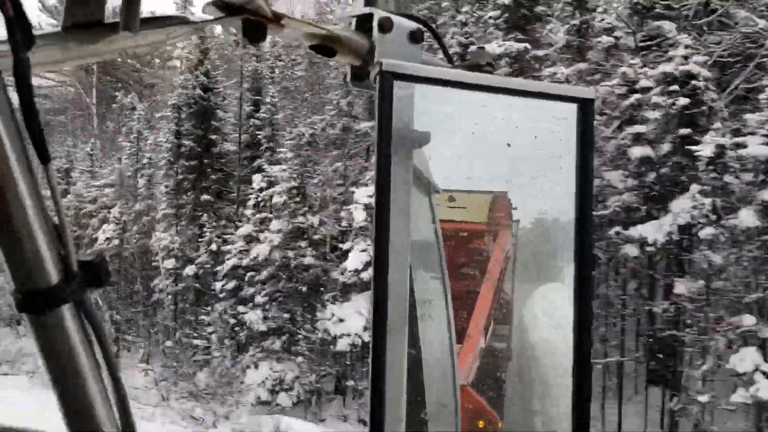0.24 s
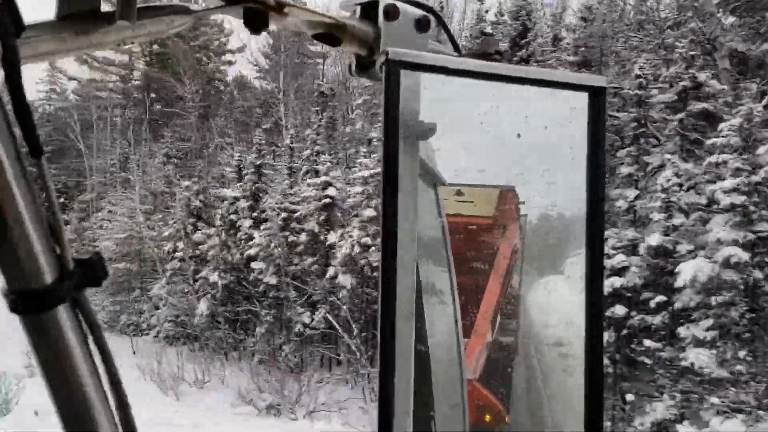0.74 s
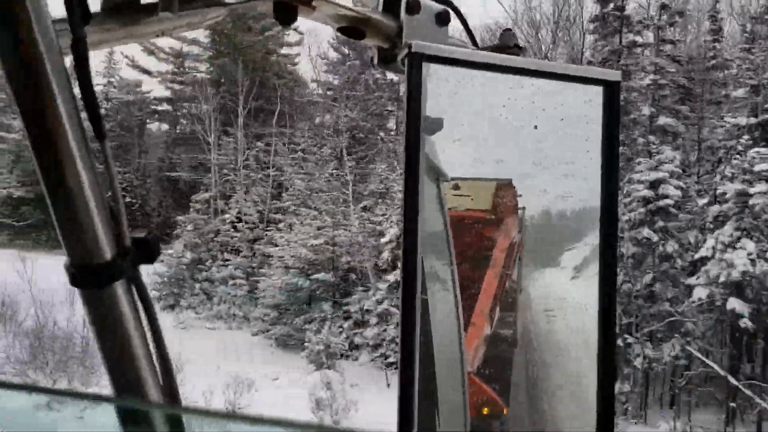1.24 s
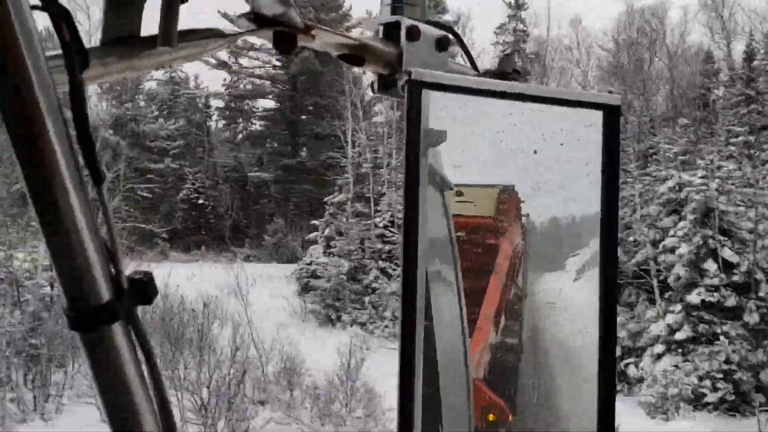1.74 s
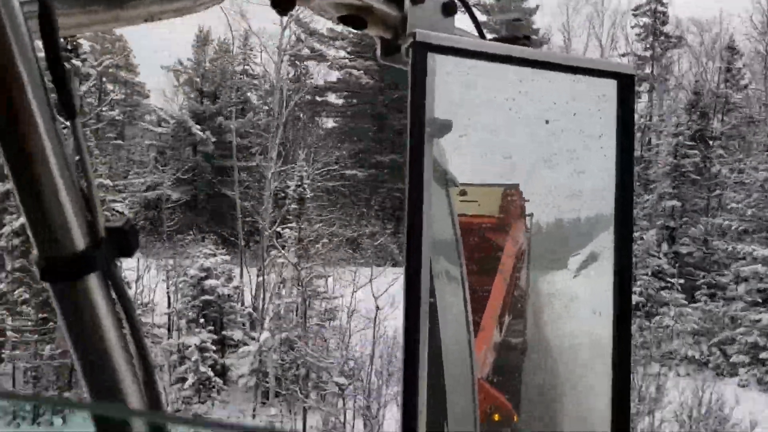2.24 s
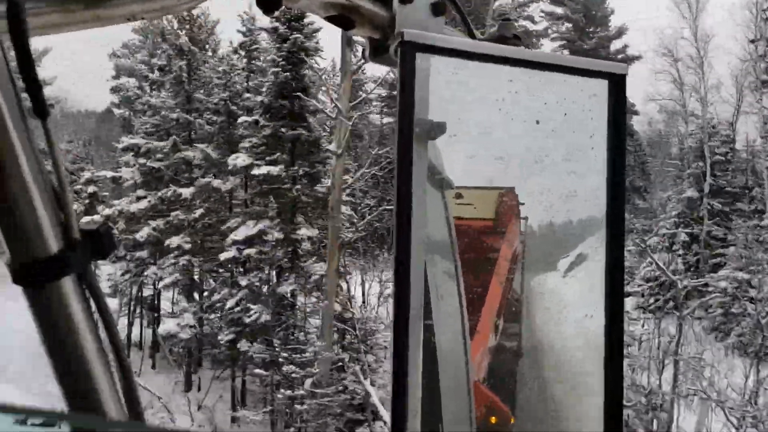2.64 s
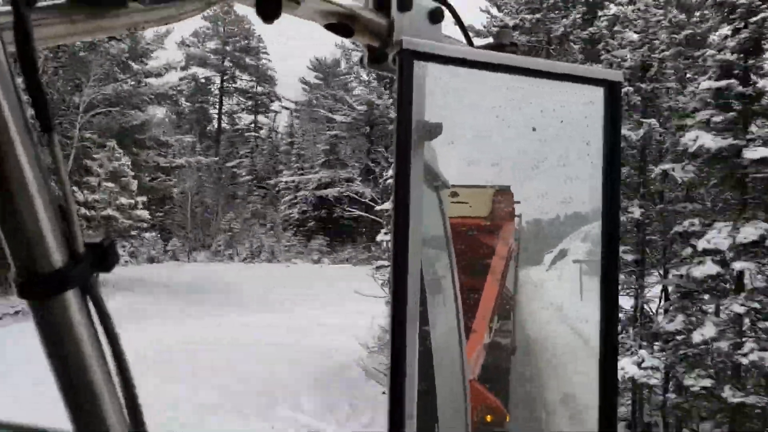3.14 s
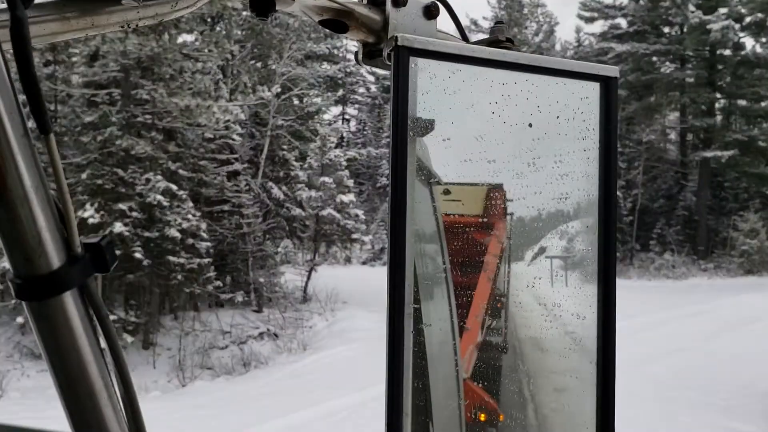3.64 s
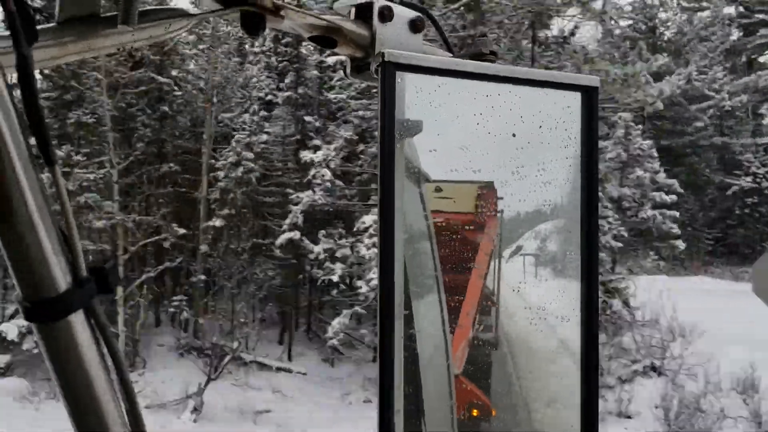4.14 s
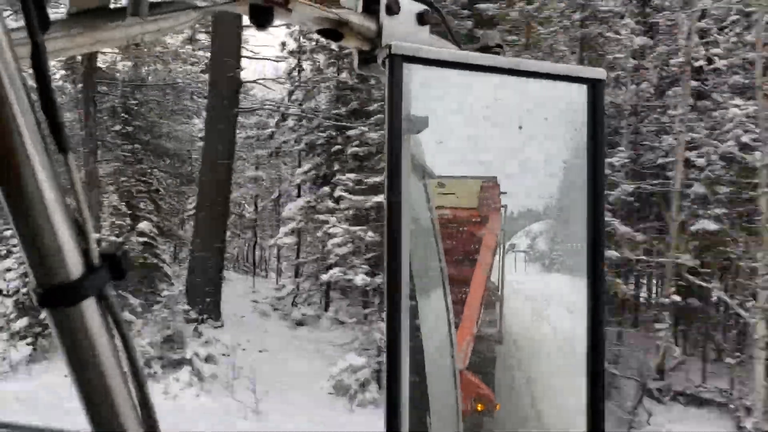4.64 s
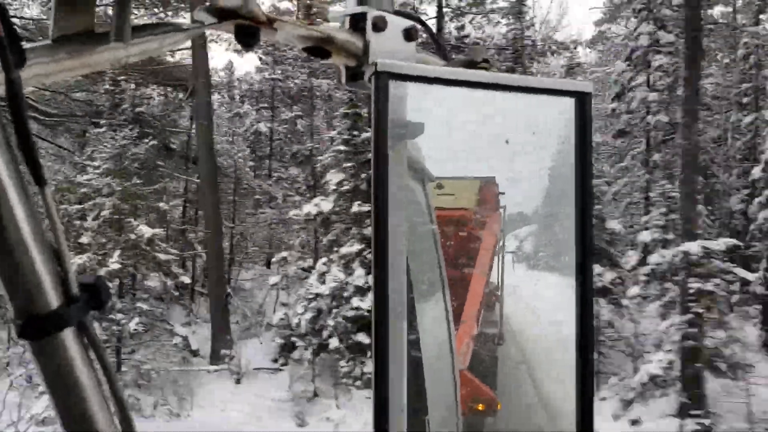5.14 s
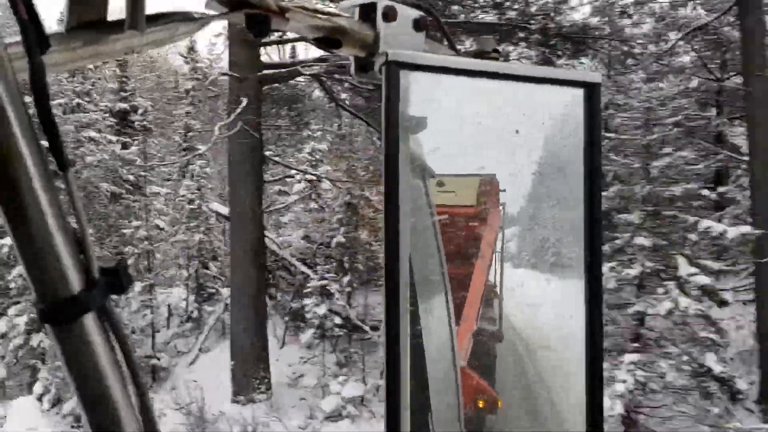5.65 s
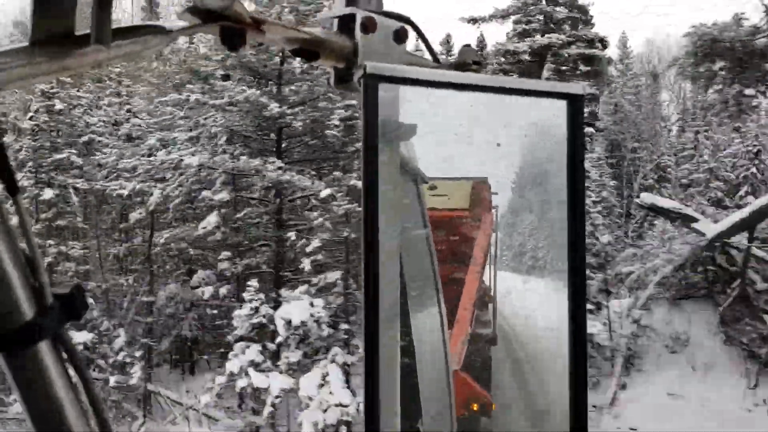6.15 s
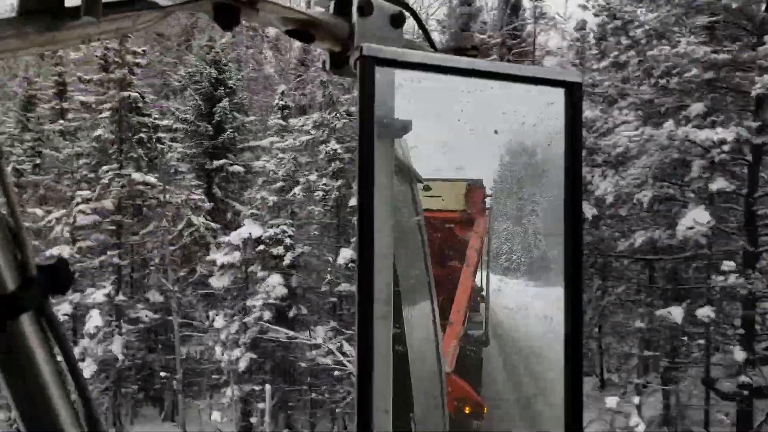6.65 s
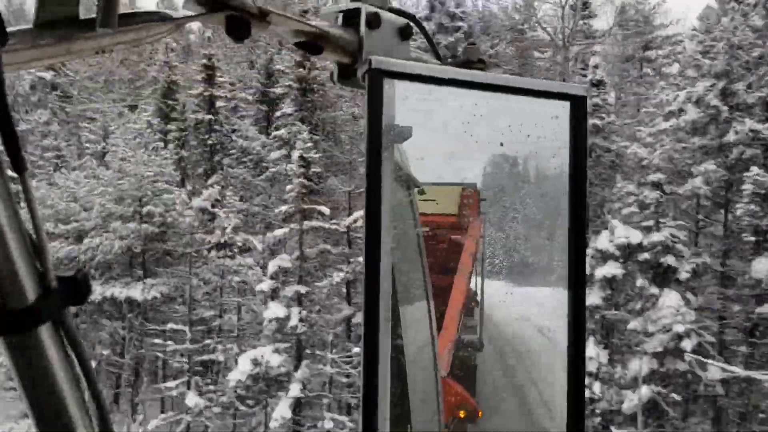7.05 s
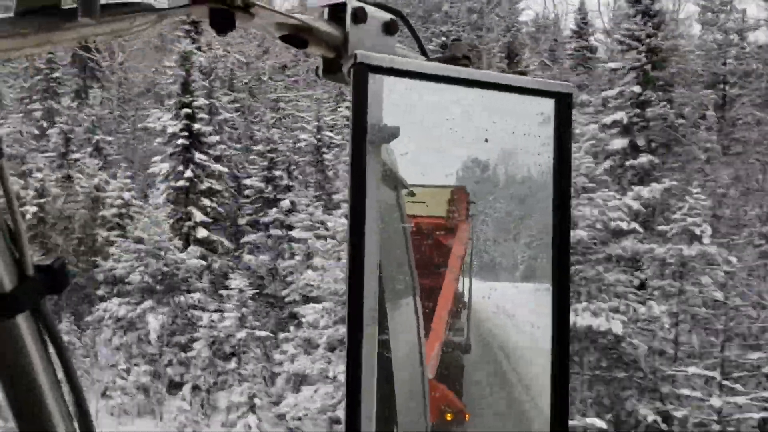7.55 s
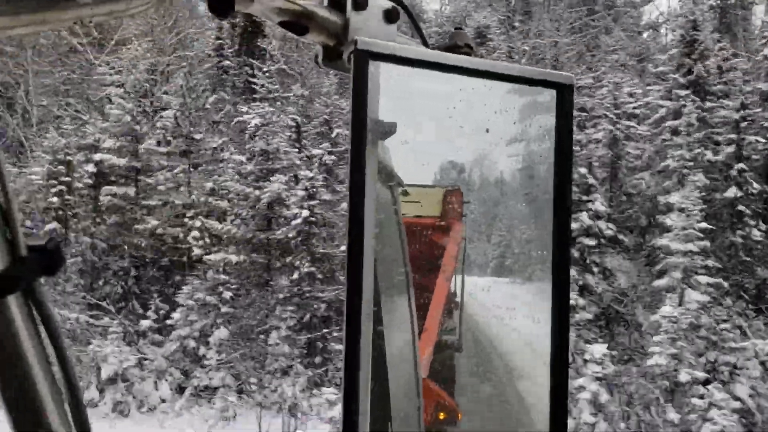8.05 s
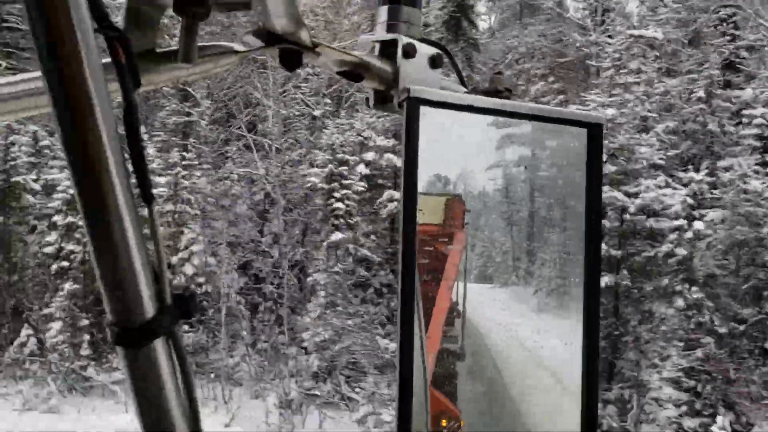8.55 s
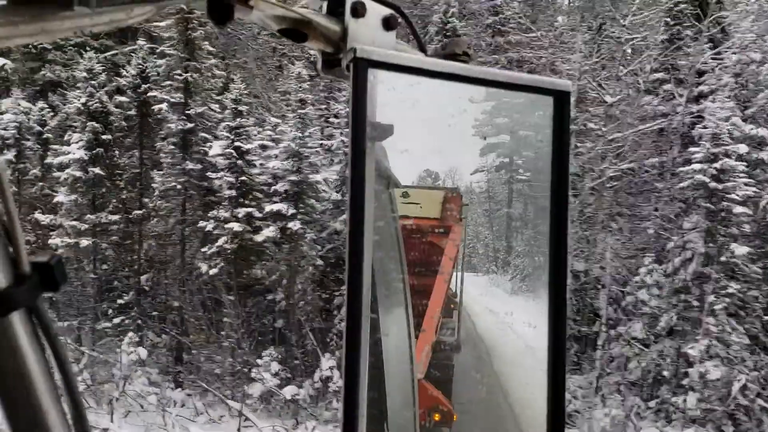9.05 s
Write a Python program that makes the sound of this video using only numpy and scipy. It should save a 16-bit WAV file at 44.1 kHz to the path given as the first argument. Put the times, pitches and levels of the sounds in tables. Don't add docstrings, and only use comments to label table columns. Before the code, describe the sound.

From an open cab window, a truck's engine brake cuts out, the turbo whistle winds down, clunks follow, then rough low braking drone returns.

```python
import sys
import numpy as np
from scipy import signal
from scipy.fft import rfft, irfft, next_fast_len
from scipy.io import wavfile
from scipy.ndimage import uniform_filter1d

SR = 44100
rng = np.random.default_rng(int(sys.argv[2]) if len(sys.argv) > 2 else 0)


def field_ratio(decibels):
    return 10 ** (np.asarray(decibels, dtype=float) / 20)


def transcribe(signal):
    frames = np.atleast_2d(signal).T
    limited = np.clip(frames, -1, 1)
    pcm = np.round(limited * 32767).astype(np.int16)
    wavfile.write(sys.argv[1], SR, pcm)


N = 410130
TIME = np.arange(N) / SR
SIZE = next_fast_len(N + SR)
FREQ = np.arange(SIZE // 2 + 1) * SR / SIZE

# time in seconds, four-stroke cycles per second.
ENGINE_SPEED = [(0.0, 11.65), (0.35, 11.45), (0.7, 11.285), (2.3, 11.6006), (3.4, 11.849), (3.8, 11.901),
                (4.3, 11.92), (4.8, 11.982), (5.4, 12.073), (6.6, 12.292), (7.8, 12.529), (8.3, 12.507),
                (8.8, 12.507), (9.28, 12.4)]
# place in the cycle 0-1, blow into the pipe in dB, crack at the stack in dB, its lag in ms.
CYLINDERS = [(0.1416, -1.1, -16.7, -6.92), (0.2941, -0.3, -10.8, 0.03), (0.4632, -2.7, -15.2, 0.19),
             (0.6307, 1.2, -6.7, 0.19), (0.7938, 3.8, -0.1, -0.15), (0.9687, 5.7, 0.1, 0.0)]
# share, lag in ms.
FLOOR_THUMPS = [(0.118, -4.13), (-0.104, -5.41), (-0.035, -4.8), (-0.089, -2.65), (0.06, -5.9),
                (-0.106, -1.85)]
# frequency in Hz, width in Hz, level in dB, polarity.
PIPE_MODES = [(68.5, 7.0, -20.2, -1.0), (102.8, 7.0, 0.0, 1.0), (119.0, 42.1, -7.3, -1.0),
              (137.8, 15.4, -3.1, 1.0), (163.3, 7.0, -0.6, 1.0), (202.9, 7.0, -14.4, -1.0),
              (226.4, 8.6, -20.7, -1.0), (268.1, 10.8, -18.2, -1.0), (283.2, 18.9, -26.8, -1.0),
              (308.2, 13.0, -13.7, -1.0)]
# frequency in Hz, width in Hz, level in dB, polarity.
STACK_MODES = [(356, 20, -1.0, -1), (440, 193, -0.6, 1), (535, 23, 0.1, -1), (629, 114, -1.4, -1),
               (812, 40, -6, 1), (1056, 500, -17, -1)]
# time in seconds, blow level in dB.
BRAKE_EFFORT = [
    [(0.0, -14.5), (0.03, -11), (0.045, -19.5), (0.065, -11), (0.195, -10.5), (0.215, -19), (0.27, -11.5),
     (0.32, -16.5), (0.42, -19)],
    [(3.695, -12.5), (3.8, -9.5), (4.63, -9.5), (6.36, -11.5), (7.1, -11.5), (7.33, -15), (8.13, -15.5),
     (8.77, -11), (9.3, -10)],
]
# time in seconds, level in dB.
COAST_HUM = [(0.3, -51), (0.44, -24.5), (2.32, -24), (2.37, -34), (2.84, -40), (3.24, -40.5), (3.6, -42),
             (3.64, -25), (3.7, -20)]
# time in seconds, level in dB.
ROAR_LEVEL = [(0.0, -37.5), (0.35, -39), (1.09, -39), (1.9, -37), (2.17, -34), (2.35, -33.5), (2.38, -37.5),
              (2.72, -44), (2.77, -45.5), (3.46, -46.5), (3.6, -41), (3.73, -37.5), (4.1, -42),
              (6.8, -39.5), (7.48, -43.5), (8.18, -44), (8.9, -39.5), (9.3, -40)]
# frequency in Hz, level in dB per Hz.
RUMBLE_SPECTRUM = [(12, -41), (20, -9.5), (145, 4), (222, -6), (313, -1.5), (463, -14.5), (511, -17.5),
                   (583, -11.5), (782, -19.5), (1000, -20.5), (1300, -61), (2200, -120)]
ROAD_SPECTRUM = [(290, -30), (500, -1), (714, -15.5), (817, -2), (1180, -18.5), (1320, -0.5), (1700, -11),
                 (1850, -21.5), (2040, -8), (5000, -30), (6500, -71), (11000, -120)]
HISS_SPECTRUM = [(2470, -20), (4200, -5.5), (5400, -12), (7270, -13), (8650, -26), (11800, -14),
                 (13800, -15), (15100, -25), (16000, -21)]
# frequency in Hz, width in Hz, level in dB against the road noise.
PANELS = [(1886, 117, -9), (839, 45, -23), (4320, 62, -35.5), (2302, 410, -13), (7300, 590, -27.5),
          (98.6, 23, -3.5)]
# time in seconds, peak in dB, hardness in Hz.
KNOCKS = [(0.077, -15, 700), (.098, -6.5, 900), (.229, -13, 600), (0.879, -3.5, 1800), (0.907, -11, 450),
          (0.932, -31, 500), (1.068, -12.5, 600), (1.077, -11, 400), (1.092, -10, 500), (1.101, -11.5, 600),
          (1.112, -20, 800), (1.368, -11.5, 450), (1.376, -14, 500), (2.099, -11, 350), (2.354, -6.5, 1200),
          (2.367, -10, 500), (2.487, -15.5, 500), (2.745, -19, 450), (2.834, -25, 500), (2.929, -23, 500),
          (3.193, -21, 500), (3.399, -23, 500), (3.498, -23, 500), (3.614, -12, 500), (3.637, -11, 1280),
          (3.664, -6, 1190), (3.68, -5, 700), (3.705, -13, 1300), (3.718, -4.5, 900), (3.745, -7.5, 800)]
# frequency in Hz, width in Hz, level in dB.
BODY_MODES = [(149, 76, 1), (284, 83, -2), (450, 83, -2), (650, 78, -3), (900, 260, 2), (1290, 160, 0)]
# frequency in Hz, correlation.
EAR_LIKENESS = [(25, 0.42), (125, 0.62), (500, 0.84), (1000, 0.7), (2000, 0.062), (4000, 0.14),
                (12000, 0.033)]
# frequency in Hz, left minus right in dB.
EAR_LEAN = [(60, 2.5), (110, 1.5), (200, -4), (380, 0), (700, -1.5), (1290, -3.0), (2380, -2.5), (4400, -2),
            (8120, 0), (15000, -1.5)]
# start in seconds, end in seconds, level in dB,
# fade in dB per second.
RUN_DOWN_HEARD = [
    (.3, .9, -63, 0),
    (.9, 1.9, -66, 2),
    (2.0, 2.76, -53, 11),
]
# frequency in Hz, climb in Hz per second, level in dB, swell in dB per second,
# wobble in Hz.
SPOOL_UP = [
    (4055, 200, -60, 6, 35),
    (6770, 260, -65, 3, 220),
]
# order, start in seconds, end in seconds, level at the end in dB,
# swell in dB per second.
GEAR_WHINE = (160.4, 0, 2.4, -41, 4)
GEAR_BUZZ = (40, 7.25, 9.4, -29.5, 6)
# start in seconds, length in seconds, frequency in Hz, level in dB, share of the drop 0-1.
SQUEALS = [
    (8.37, .26, 2530, -44, 1),
    (8.67, .08, 2350, -45, 0),
    (8.85, .05, 2520, -47, 0),
]


def rms_one(x):
    return x / np.sqrt(np.mean(x ** 2) + 1e-20)


def evened(x):
    return x / np.sqrt(uniform_filter1d(x ** 2, size=SR // 3) + 1e-12)


def in_time(rows, outside=None):
    seconds, values = np.transpose(rows)
    return np.interp(TIME, seconds, values, outside, outside)


def at_hz(points, hz):
    table = np.array(points)
    return np.interp(np.log(hz), np.log(table[:, 0] + 1), table[:, 1])


def heard(start_s, end_s, edge_s=0.044):
    ramp = np.minimum(TIME - start_s, end_s - TIME) / edge_s
    return 20 * np.log10(np.clip(ramp, 1e-5, 1))


def drift(rate):
    r = np.exp(-80 * np.pi * rate / SR)
    white = rng.standard_normal(N // 40 + 2002)
    slow = signal.lfilter([1], [1, -2 * r, r * r], white)[2000:]
    return np.interp(np.arange(N) / 40, np.arange(len(slow)), rms_one(slow - slow.mean()))


def peak(hz, width_hz):
    return 1j * FREQ * width_hz / (hz ** 2 - FREQ ** 2 + 1j * FREQ * width_hz)


def resonances(modes, tilt_db=0):
    return sum(sign * field_ratio(db + tilt_db * (-1) ** k) * peak(hz, width)
               for k, (hz, width, db, sign) in enumerate(modes))


def to_time(spectrum):
    return irfft(spectrum, SIZE)[..., :N]


def through(x, response):
    return to_time(rfft(x, SIZE) * response)


def clicks(times, sizes):
    at = times * SR
    whole = np.floor(at).astype(int)
    train = np.zeros(SIZE)
    np.add.at(train, whole % SIZE, sizes * (1 - at + whole))
    np.add.at(train, (whole + 1) % SIZE, sizes * (at - whole))
    return rfft(train)


def firings(places):
    s = np.arange(-SR // 2, N) / SR
    turns = np.cumsum(np.interp(s, *np.transpose(ENGINE_SPEED))) / SR
    turns = turns - turns[SR // 2 - 1]
    return np.interp(np.arange(-5, int(turns[-1]))[:, None] + places, turns, s)


def banded_noise(spectrum, patchy_db, gate=1):
    low_hz, high_hz = max(spectrum[0][0], 20), min(spectrum[-1][0], 17000)
    edges = np.geomspace(low_hz, high_hz, int(3 * np.log2(high_hz / low_hz)) + 2)
    together = drift(7.9)
    white = rng.standard_normal((2, 2, N)) * gate
    out = 0
    for k, (low, high) in enumerate(zip(edges, edges[1:])):
        band = signal.butter(2, [low, high], "band", fs=SR, output="sos")
        mid, side = signal.sosfilt(band, white[k % 2])
        hz = np.sqrt(low * high)
        alike = np.clip(at_hz(EAR_LIKENESS, hz), 0, 1)
        gain = field_ratio(at_hz(spectrum, hz) + patchy_db * (0.24 * together + drift(14.1)))
        lean = field_ratio(at_hz(EAR_LEAN, hz) / 2 * np.array([[1], [-1]]))
        ears = np.sqrt(1 + alike) * mid + np.sqrt(1 - alike) * side * [[1], [-1]]
        out = out + gain * lean * ears
    return rms_one(out)


def roar(puff):
    road_db = in_time(ROAR_LEVEL)
    swing_db = road_db + 40
    braked = uniform_filter1d(puff, size=SR // 6)
    hiss_db = -54 + 0.99 * swing_db + 1.5 * braked
    frame_db = -29.5 + 0.74 * swing_db + 7 * braked
    road = banded_noise(ROAD_SPECTRUM, patchy_db=2.32, gate=1 + 0.17 * puff)
    white = rng.standard_normal((2, N)) * field_ratio(2.0 * drift(23)) * (1 + 0.44 * puff)
    panels = sum(field_ratio(db) * rms_one(through(white, peak(hz, width) ** 2)) for hz, width, db in PANELS)
    hiss_gate = (1 + 0.16 * puff) * field_ratio(1.0 * drift(40))
    hiss = banded_noise(HISS_SPECTRUM, patchy_db=1.74, gate=hiss_gate)
    rumble = field_ratio(frame_db) * banded_noise(RUMBLE_SPECTRUM, patchy_db=1.6)
    boom_db = road_db + 6.5 + heard(2.25, 4)
    boom = field_ratio(boom_db) * rms_one(through(white[0], peak(85, 57) ** 2))
    return boom + rumble + field_ratio(road_db + 6) * (road + panels) + field_ratio(hiss_db + 5.0) * hiss


def whistle(hz, db, wobble_hz, flutter_db, octave_db=-120):
    level = field_ratio(db + 3 + flutter_db * drift(30))
    turn = 2 * np.pi * np.cumsum(hz + wobble_hz * drift(60)) / SR
    return level * (np.sin(turn) + field_ratio(octave_db) * np.sin(2 * turn))


def turbo():
    start_s, start_hz, rest_hz, tau_s = 0.2, 6230, 3000, 2.25
    hz = rest_hz + (start_hz - rest_hz) * np.exp((start_s - TIME) / tau_s)
    db = np.max([heard(start, end) + level_db - fade * (TIME - start)
                 for start, end, level_db, fade in RUN_DOWN_HEARD], axis=0)
    out = whistle(hz, db, 34.2, 4.4, octave_db=-15)
    spool_s = 8.2
    since = TIME - spool_s
    for hz, climb, level_db, swell, wobble in SPOOL_UP:
        db = heard(spool_s, 10, .1) + level_db + swell * since
        out = out + whistle(hz + climb * since, db, wobble, 3)
    return out


def order_tone(order, start_s, end_s, db, swell, rest_db, wobble_hz):
    level_db = np.maximum(heard(start_s, end_s, .15) + db + swell * (TIME - end_s), rest_db)
    return whistle(order * in_time(ENGINE_SPEED), level_db, wobble_hz, 2.5)


def squeal():
    slide_hz, slide_s, drop_hz, drop_s = 110, .03, 330, .03
    hz, db = np.zeros(N), np.full(N, -120.)
    for start, length, top_hz, top_db, drop in SQUEALS:
        since = np.clip(TIME - start, 0, length)
        on = (since > 0) & (since < length)
        rise = slide_hz * np.exp(-since / slide_s)
        fall = drop * drop_hz * np.exp((since - length) / drop_s)
        hz = np.where(on, top_hz - rise - fall, hz)
        db = np.maximum(db, top_db + heard(start, start + length, .008))
    return whistle(hz, db, 40, 3.0)


def knocks():
    out = np.zeros(N)
    chance = rng.standard_normal((len(KNOCKS), len(BODY_MODES)))
    since = TIME[:SR // 10]
    for (at, db, hard_hz), uneven in zip(KNOCKS, chance):
        ring = 0
        for (hz, width, level_db), u in zip(BODY_MODES, uneven):
            strength = np.sign(u) * field_ratio(level_db + 2.0 * abs(u)) / (1 + (hz / hard_hz) ** 3)
            ring = ring + strength * np.sin(2 * np.pi * hz * since) * np.exp(-np.pi * width * since)
        push = np.hanning(int(SR / hard_hz / 2) + 3)
        ring = np.convolve(ring, push / push.sum())[:len(since)]
        out[round(at * SR):][:len(since)] += field_ratio(db) * ring / np.abs(ring).max()
    return out


def coast():
    at = firings(np.arange(6) / 6)
    strokes = clicks(at, field_ratio(0.77 * rng.standard_normal(at.shape)))
    hum = evened(to_time(strokes * (peak(124.0, 40) ** 2 + 0.4 * peak(58.0, 23) ** 2)))
    level = uniform_filter1d(field_ratio(in_time(COAST_HUM, -120)), size=2000)
    return level * hum * field_ratio([[-1.5], [1.5]])


def rasp(bursts_at):
    bursts = np.clip(to_time(bursts_at / (1 + 1j * FREQ / 140) ** 2), 0, None)
    air = rng.standard_normal((3, N))
    mouth = peak(790, 500) * peak(820, 780) + 0.13 * peak(1760, 550) ** 2
    torn = through((air[0] + 1.4 * air[1:]) * bursts, mouth)
    return field_ratio(-26) * rms_one(torn) * field_ratio([[-2], [2]])


def pipe_drone(blows, floor):
    soft = 1 / (1 + 1j * FREQ / 244)
    drone = np.array([field_ratio(lean_db) * evened(to_time((blows * resonances(PIPE_MODES, tilt) + floor) * soft))
                      for tilt, lean_db in ((-.6, -.1), (.6, .1))])
    dull = np.clip(3.9 * (12.05 - in_time(ENGINE_SPEED)), 0, 0.43)
    return drone + dull * through(drone, 2.7 * peak(402, 14) - peak(256, 220))


def brake_levels():
    level = np.max([field_ratio(in_time(curve, -120)) for curve in BRAKE_EFFORT], axis=0)
    bite_db = 0
    for curve in BRAKE_EFFORT:
        since = TIME - curve[0][0]
        bite_db = bite_db + 17 * (since >= 0) * np.exp(-np.abs(since) / 0.058)
    crack_db = np.minimum(-22 + 20 * (in_time(ENGINE_SPEED) - 12.075), -16.5)
    sharp = level * field_ratio(crack_db + bite_db)
    return uniform_filter1d(level, size=900), uniform_filter1d(sharp, size=900)


def brake(jitter_ms=.05, uneven_db=.7):
    place, blow_db, crack_db, crack_ms = np.transpose(CYLINDERS)
    share, lag_ms = np.transpose(FLOOR_THUMPS)
    at = firings(place)
    at = at + jitter_ms / 1000 * rng.standard_normal(at.shape)
    chance = field_ratio(uneven_db * rng.standard_normal(at.shape))
    blows = clicks(at, field_ratio(blow_db) * chance)
    floor = clicks(at + lag_ms / 1000, share * chance) * peak(132, 50)
    drone = pipe_drone(blows, floor)
    steep = clicks(at + crack_ms / 1000, field_ratio(crack_db) * chance ** 3)
    crack = evened(to_time(steep * resonances(STACK_MODES) / (1 + (FREQ / 2500) ** 4)))
    puff = to_time(steep / (1 + 1j * FREQ / 40) ** 2)
    tears = rasp(clicks(at + .002, field_ratio(.7 * crack_db + 2.2 * rng.standard_normal(at.shape))))
    level, sharp = brake_levels()
    sound = level * (drone + tears) + sharp * crack * field_ratio([[-1.5], [1.5]])
    return sound, puff / puff.mean() * np.clip(4.3 * level, 0, 1)


def scene():
    braking, puff = brake()
    whine = order_tone(*GEAR_WHINE, rest_db=-62 + heard(0, 3.8, .3), wobble_hz=10)
    buzz = order_tone(*GEAR_BUZZ, rest_db=-120, wobble_hz=3)
    tones = turbo() + whine + squeal() + buzz
    left, right = braking + coast() + knocks() + roar(puff)
    sample = np.arange(N)
    late_left = np.interp(sample - 11.0, sample, left)
    return np.array([late_left, right]) + tones * field_ratio([[-2], [2]])


def low_pass(x):
    return signal.sosfilt(signal.butter(12, 16000, fs=SR, output="sos"), x)


def record(dry):
    rounded = 1.31 * np.tanh(dry / 1.137)
    top_cut = signal.cheby2(16, 70, 16100, fs=SR, output="sos")
    return low_pass(signal.sosfilt(top_cut, rounded))


dry = scene()
out = record(dry)
transcribe(out)
```